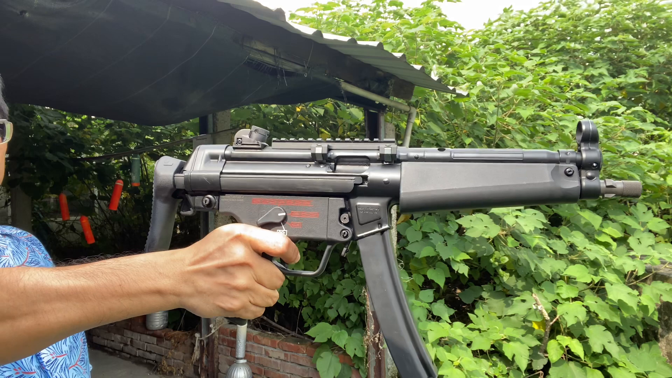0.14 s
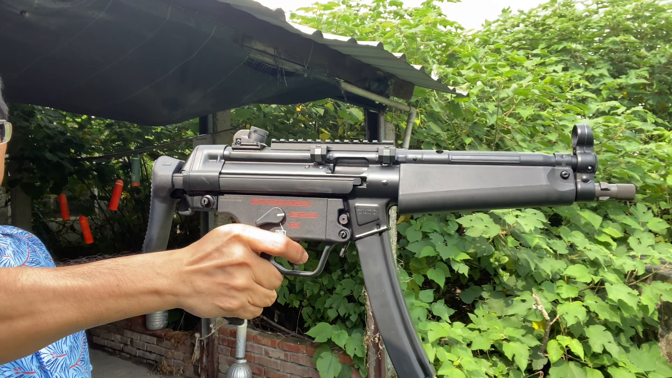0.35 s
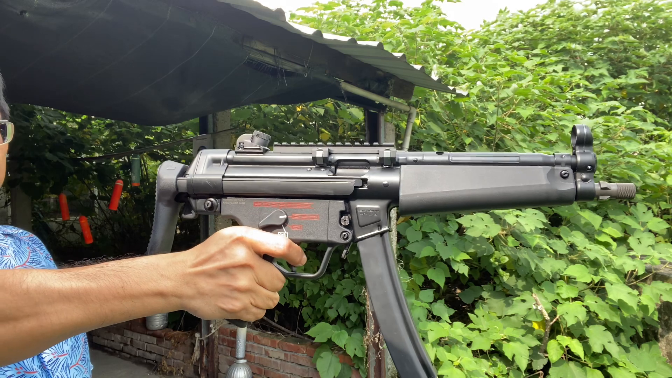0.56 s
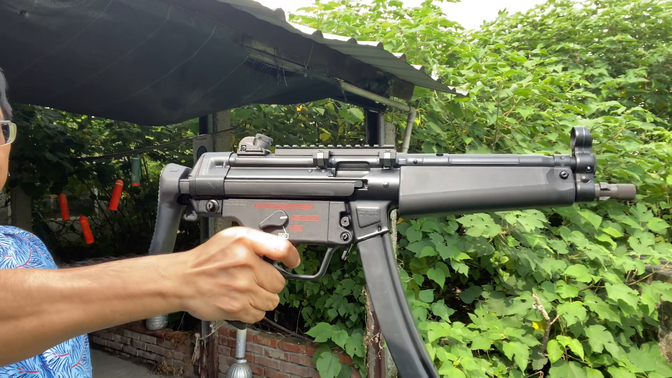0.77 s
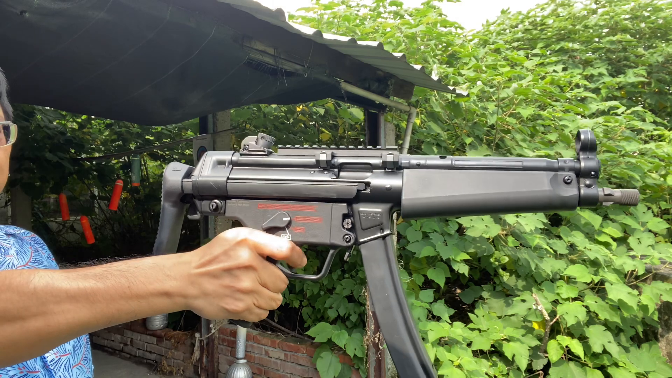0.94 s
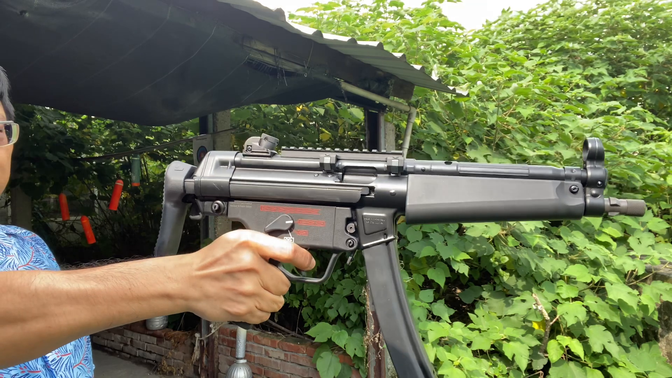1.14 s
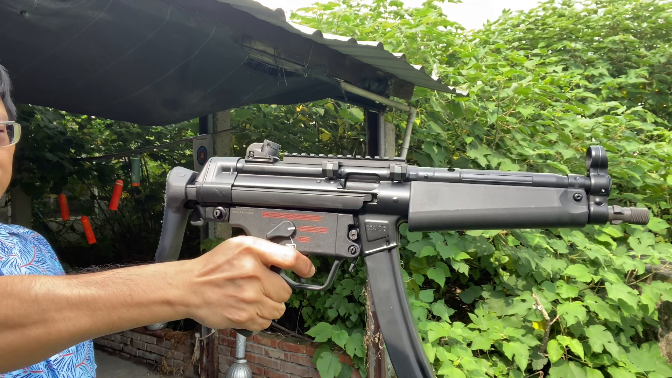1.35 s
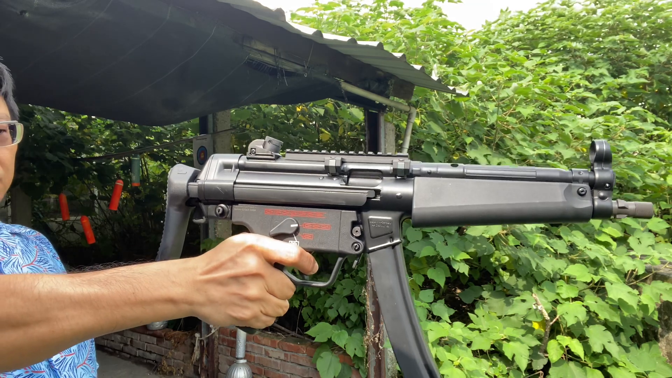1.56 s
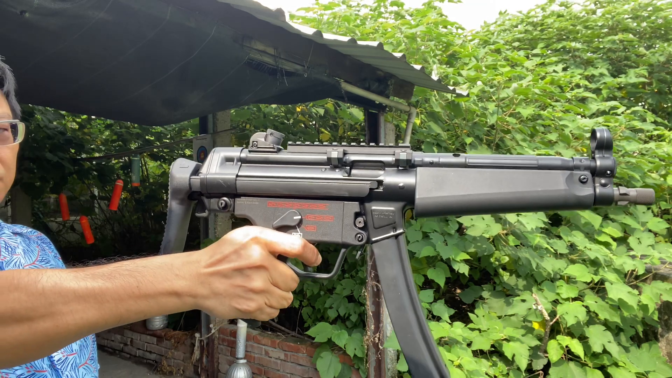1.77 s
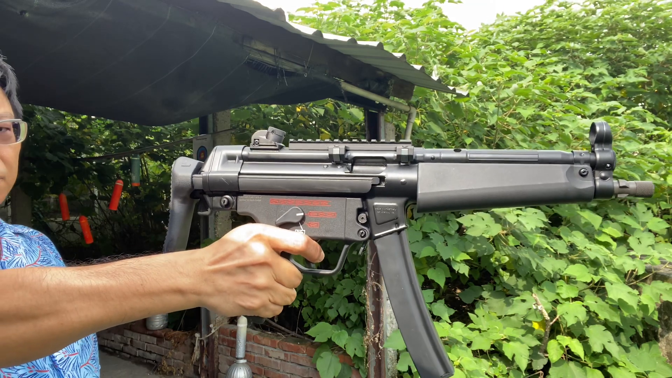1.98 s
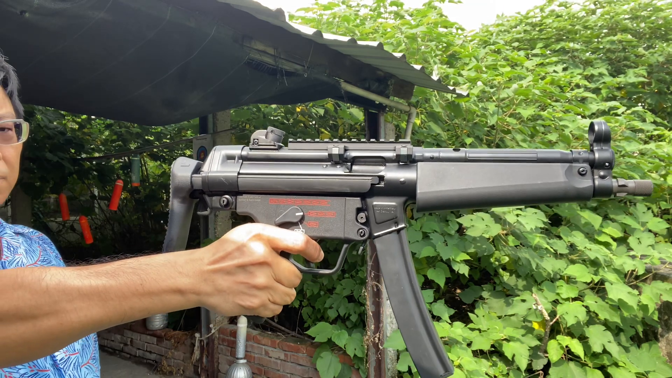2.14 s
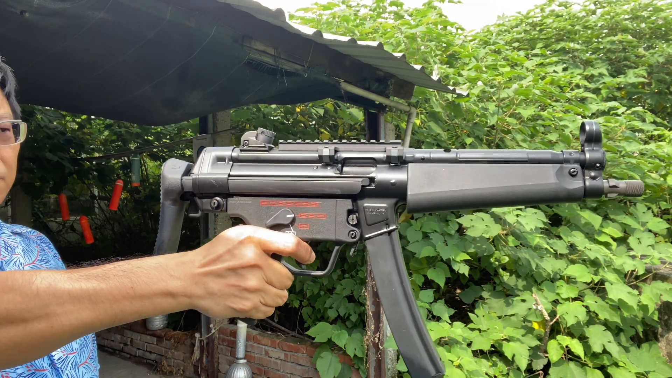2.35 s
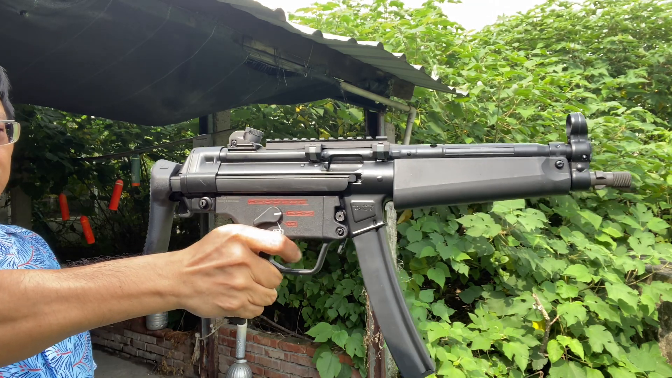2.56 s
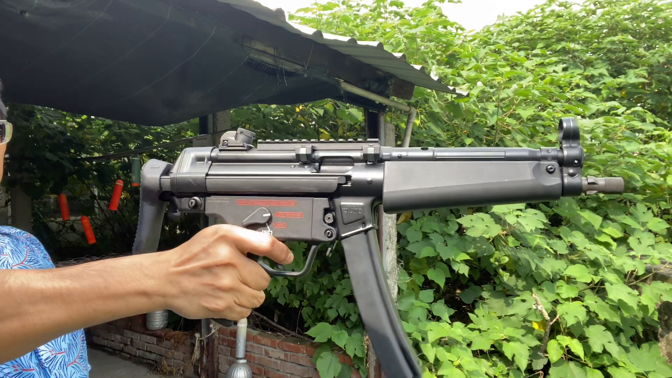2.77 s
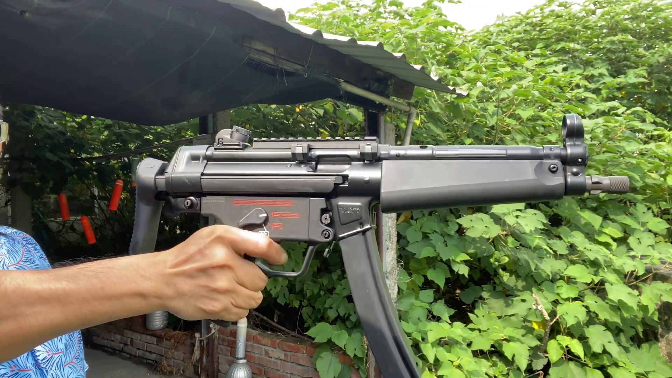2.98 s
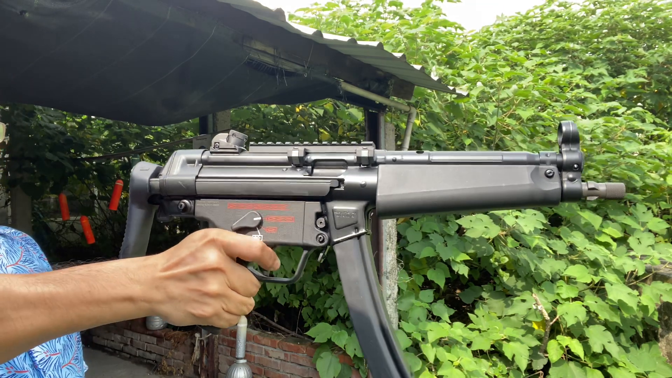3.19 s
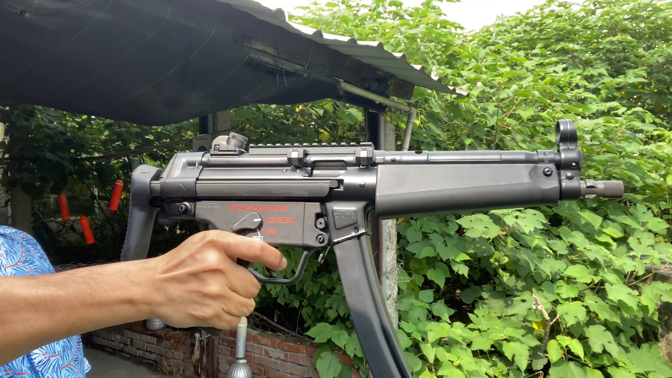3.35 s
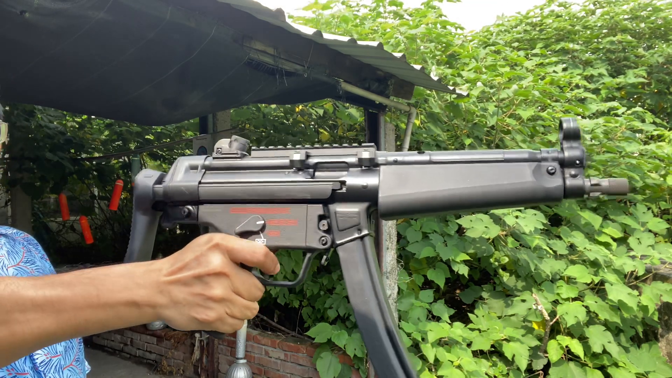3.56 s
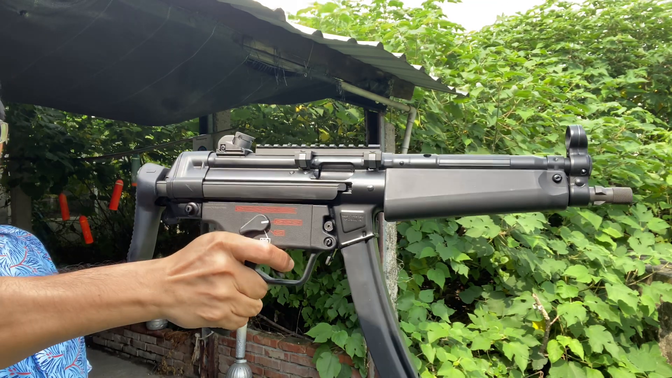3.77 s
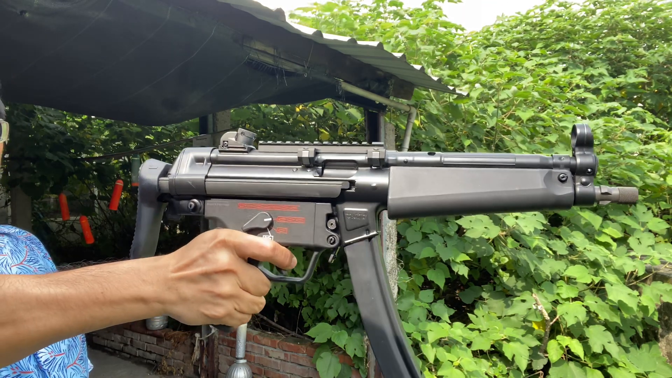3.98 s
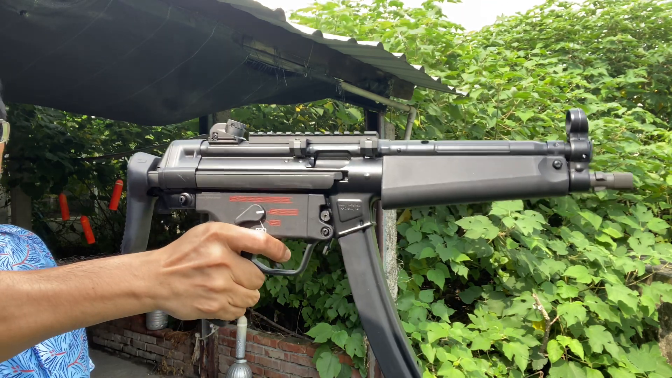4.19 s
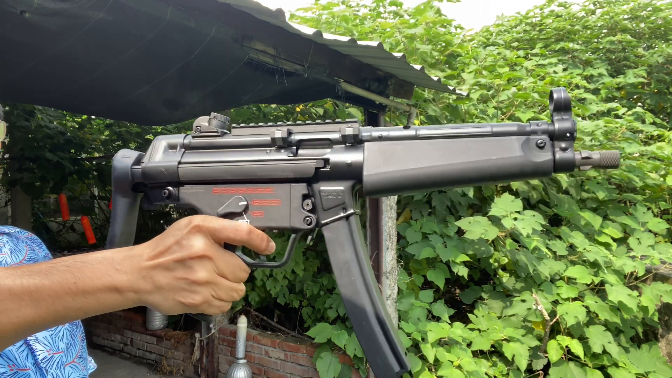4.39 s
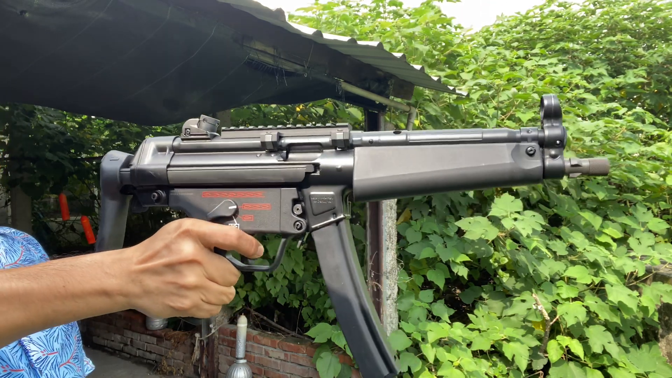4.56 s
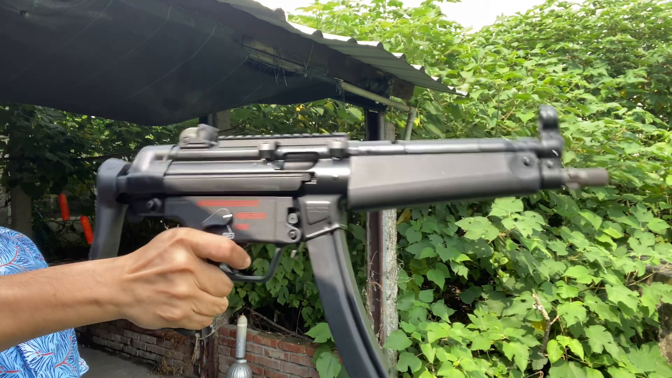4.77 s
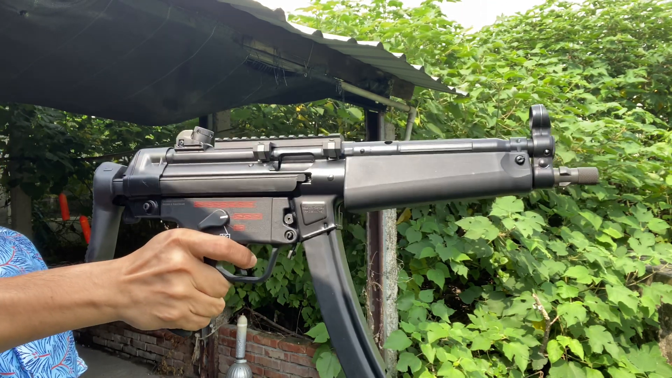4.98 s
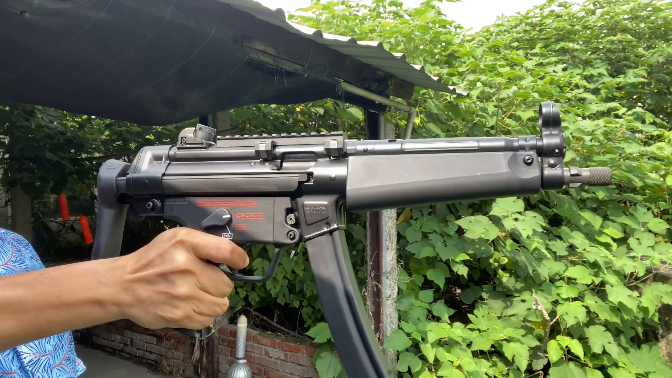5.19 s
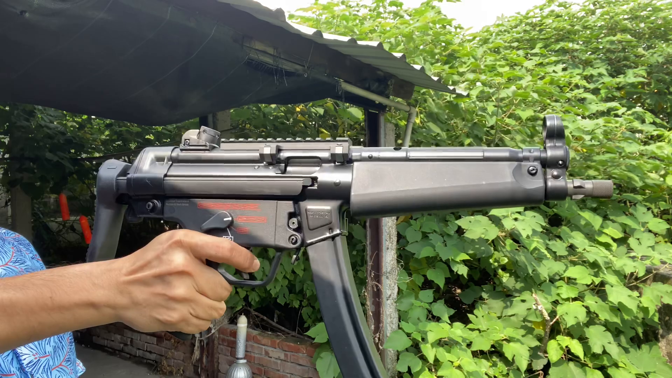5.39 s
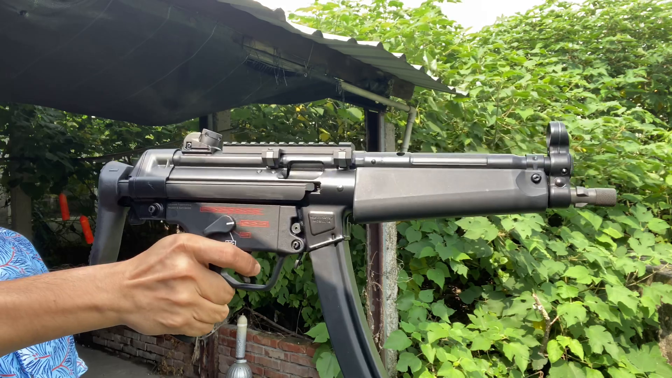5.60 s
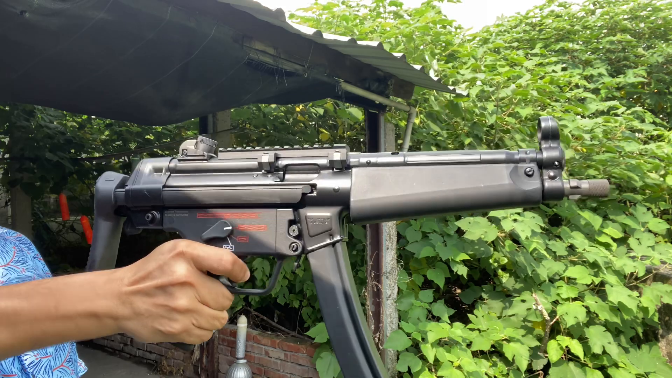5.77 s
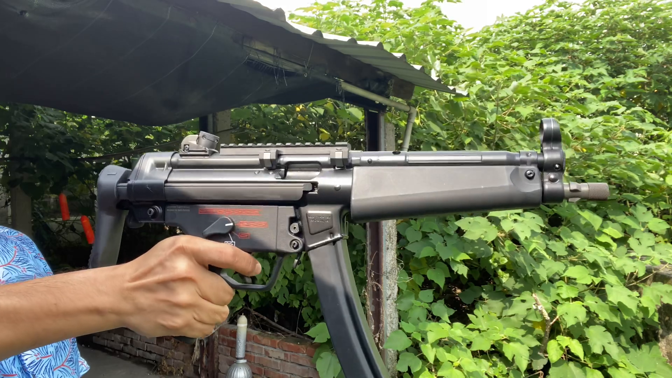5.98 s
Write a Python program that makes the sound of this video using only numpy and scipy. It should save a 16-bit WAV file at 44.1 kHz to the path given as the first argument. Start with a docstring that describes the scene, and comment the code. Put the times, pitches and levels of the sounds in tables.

```python
"""First a dying burst echo, trigger clicks and a bird call; then a close gas blowback airsoft rifle fires
seven three-round bursts under a sheet-metal roof. Each round is a timed run of noise crashes, air thumps and
a gas note: hammer on valve, bolt back to its buffer, slam home, bounce. A pellet rings a metal target; the bird
is a wavering tone. Breeze, garden air and hum are noise and a sine. The shots overload the microphone."""
import sys
import numpy as np
from scipy import signal
from scipy.fft import rfft, irfft
from scipy.io import wavfile
from scipy.ndimage import uniform_filter1d, minimum_filter1d

SR = 44100
rng = np.random.default_rng(int(sys.argv[2]) if len(sys.argv) > 2 else 0)


def dump(signal):
    """Clip the signal to [-1, 1] and save it as 16-bit WAV at the path in sys.argv[1]."""
    limited = np.clip(np.atleast_2d(signal).T, -1, 1)
    pcm = np.round(limited * 32767).astype(np.int16)
    wavfile.write(sys.argv[1], SR, pcm)


N = 266397
TIME_S = np.arange(N) / SR

# bursts, one per trigger pull; the action slows as the gas cools:
# (first hammer fall [s], time per round [s], first bolt trip back and home [s], feeding level [dB])
BURSTS = [(0.6076, 0.062, .0368, -3.5), (2.595, 0.061, 0.038, 0), (3.0049, 0.061, 0.042, -1.5),
          (3.4632, 0.065, 0.041, 3), (4.657, .062, .0428, 2), (5.147, 0.067, 0.041, 4.5),
          (5.6706, 0.069, .0452, 0)]
ROUNDS_PER_BURST = 3
BOLT_LAG_S = 0.0008  # added to the bolt trip with each round of a burst
BOUNCE_SHARE = 0.255  # bounce delay as a share of the bolt trip
FIRING_DB, SLAM_DB, BOUNCE_DB = 0, 0.46, 2.5
PRESSURE_LOSS_DB = 0.33  # per round within a burst

# trigger, sear, hammer, valve, gas, muzzle puff, buffer, receiver rattle, around the hammer fall:
# (delay [s], level [dB], t60 [s], tilt [dB/octave])
FIRING_BLOWS = [(-.013, -40, 0.048, -0.5), (-.0085, -21.5, .018, 5), (-.0035, -20.5, .05, -1),
                (.001, -2, .028, 0.3), (.005, -9, .04, 1), (.009, -6.5, .04, -1.77),
                (.014, -4.5, 0.048, 1.62), (.019, -6.5, 0.06, 0)]
# bolt strips and chambers a pellet, before the slam: (delay [s], level [dB], t60 [s], tilt [dB/octave])
FEEDING_BLOWS = [(-.007, -19.5, .04, 0), (-.0038, -12.5, .04, -1.9)]
# bolt slams home and seats: (delay [s], level [dB], t60 [s], tilt [dB/octave])
SLAM_BLOWS = [(0, 0.5, .03, -0.5), (.0028, -1, 0.019, 1.5)]
# bolt lands again, loose parts settle: (delay [s], level [dB], t60 [s], tilt [dB/octave])
BOUNCE_BLOWS = [(0, -1, 0.024, 2.5), (.006, -14.5, 0.061, -1)]
# air pumped by the firing gun: (delay [s], mean frequency [Hz], level [dB], t60 [s])
FIRING_JOLTS = [(.0002, 91.4, -7, .018), (.0036, 228.3, -11.5, 0.053), (.0096, 255, -11, .026),
                (0.0111, 583, -13, .045)]
# air pumped by the closing bolt: (delay [s], mean frequency [Hz], level [dB], t60 [s])
CLOSING_JOLTS = [(.001, 43.58, -2.5, 0.028), (.002, 24.09, -24.5, 0.32)]
# relative spectrum of the firing blows: (frequency [Hz], level [dB])
FIRING_COLOUR = [(120, -23), (300, -6), (450, -5), (580, 0), (720, 0), (1050, 3.5), (1400, -4), (1850, 0),
                 (2400, -7), (4000, -2), (7500, -8.5), (12000, -10), (16000, -14.5)]
# relative spectrum of the closing blows: (frequency [Hz], level [dB])
CLOSING_COLOUR = [(120, -19.5), (300, -14), (500, -4), (900, 1.5), (1300, 0.5), (1600, -2.5), (2400, -4),
                  (4000, 1), (7500, -6), (12000, -8.5), (13300, -10.5), (16000, -15.5)]
# receiver resonances: (frequency [Hz], width [Hz], boost [dB])
RECEIVER_MODES = [(602, 45, -3.5), (1123, 11, -9), (1230, 30, -6), (1886, 28, -3.5), (3690, 120, -8.5),
                  (5030, 180, 0.5), (7640, 77, -6), (9500, 88, -1), (14000, 400, -12.5)]
# bolt resonances: (frequency [Hz], width [Hz], boost [dB])
BOLT_MODES = [(870, 90, -2), (1327, 51, -2.5), (2080, 59, -5.5), (3430, 66, -4.5), (6523, 91, -0.5),
              (8870, 190, 1), (11610, 80, -7)]

# gas note: hollow upward swoop in every round; swoop time is a time constant
GAS_DELAY_S, GAS_LENGTH_S, GAS_SWOOP_S = 0.0095, 0.021, 0.0055
GAS_START_HZ, GAS_END_HZ, GAS_DB = 150, 606.8, -15.5

# trigger let go: (last click [s], run length [s], level [dB])
RELEASES = [(0.1871, .013, -17.5), (0.9911, .017, -17.5), (2.804, 0.012, -16.5), (3.242, .021, -17),
            (3.678, 0.019, -18.5), (4.8912, 0.012, -16.5), (5.352, 0.015, -12), (5.95, 0.013, -16)]
# clicks of one release, slack through ratchet to sear: (lead [run lengths], level [dB])
RELEASE_CLICKS = [(2.3, -17), (1, -5), (.45, -3), (0, 0)]
# relative spectrum of the trigger clicks: (frequency [Hz], level [dB])
RESET_COLOUR = [(200, -35.5), (390, -17), (520, 1.5), (1000, -4.5), (2000, -4), (4500, -2.5), (7000, -3.5),
                (11000, -4.5), (14000, -1), (16000, 0)]
# sear resonances: (frequency [Hz], width [Hz], boost [dB])
SEAR_MODES = [(15000, 200, -0.5), (13400, 400, 2.5)]
# faint ticks as the gun shifts in the hands: (time [s], level [dB])
HANDLING_TICKS = [(3.899, -57), (3.9674, -53), (4.1682, -59.5), (5.09, -54.5), (5.6, -59)]

# pellet strikes metal down range: (time [s], level [dB])
PELLET_HIT = (5.927, -37.5)
# metal target modes: (frequency [Hz], level [dB], t60 [s])
TARGET_MODES = [(1330, -10, 0.56), (1783, -12, 0.69), (2740, -9, 0.6), (2848, -5, .22), (3461, -1, 0.24),
                (3880, -6, 0.6), (4830, 2, 0.17), (5076, -7, 0.45), (6600, -7, .2)]

# relative spectrum of the shelter echo: (frequency [Hz], level [dB])
SHELTER_COLOUR = [(60, -13), (250, -4.5), (500, -1), (900, -1.5), (2400, 1), (3800, -4), (6000, -1.5),
                  (10000, -2.5), (16000, -6)]
# decay of the shelter echo: (frequency [Hz], t60 [s])
SHELTER_T60 = [(100, 0.68), (500, 0.22), (1000, 0.4), (2500, 0.3), (4000, .35), (9000, 0.29), (16000, 0.19)]
# dull repeat of the gun's echo from across the garden
FAR_ECHO_S, FAR_ECHO_DB, FAR_ECHO_CUT_HZ = 0.27, -32.5, 3100

# bird calls, held note then falling run: (start [s], length [s], time per note [s], slur [0-1], level [dB])
BIRD_CALLS = [(.214, .24, .0343, 0, -59), (1.01, .2, .04, 0, -68), (1.442, .21, .045, .1, -68),
              (1.82, .17, .036, .6, -64)]
# short buzzy chirp ending a call: (start [s], length [s], start pitch [Hz], end pitch [Hz], level [dB])
BIRD_CHIRPS = [(1.972, 0.059, 4670, 3450, -68)]
# bird echoes from across the garden: (delay [s], level [dB])
BIRD_ECHOES = [(.04, -11.5), (.098, -11), (.226, -14.5)]
BIRD_TOP_HZ, BIRD_BOTTOM_HZ = 3680, 1700  # nominal ends of the descent
BIRD_FADE_DB = 8.5  # over the descent
BIRD_STRAY = 0.04  # random pitch error of run notes, as a share
FLICK_HZ, FLICK_S = 850, 0.0074  # upward flick at each note break

# breeze on the microphone: (time [s], level [dB])
BREEZE_LEVEL = [(0, -64), (2.4, -63), (2.9, -54), (3.4, -49), (3.85, -60), (3.92, -47), (4.42, -46.5),
                (4.52, -37), (4.62, -48.5), (5.0, -53), (6.04, -62.5)]
# relative spectrum of the breeze: (frequency [Hz], level [dB])
BREEZE_COLOUR = [(15, -3), (30, 3.5), (50, 0.5), (85, -17.5), (150, -33), (400, -53), (2000, -93.5)]
# relative spectrum of the garden air: (frequency [Hz], level [dB])
GARDEN_COLOUR = [(35, -29.5), (60, -5), (168, -11.5), (469, -12), (621, -17), (803, -19), (903, -20),
                 (1660, -28.5), (3760, -30), (6740, -38.5), (14600, -40), (16000, -43.5)]
GARDEN_DB = -67

RECORDER_CUTOFF_HZ = 15900


def rifle():
    """Every round fires, feeds a pellet, slams shut and bounces; receiver and bolt ring on their blows."""
    fire_s, trip_s, fire_db, feed_db = rounds()
    slam_s = fire_s + trip_s
    bounce_s = slam_s + BOUNCE_SHARE * trip_s
    slam_db = np.full_like(fire_s, SLAM_DB)
    bounce_db = np.full_like(fire_s, BOUNCE_DB)
    firing = stroke(fire_s, fire_db, FIRING_BLOWS, FIRING_COLOUR, scatter_s=0.0004, scatter_db=2.65)
    feeding = stroke(slam_s, feed_db, FEEDING_BLOWS, CLOSING_COLOUR, scatter_s=0.00069, scatter_db=2.0)
    slam = stroke(slam_s, slam_db, SLAM_BLOWS, CLOSING_COLOUR, scatter_s=0.0001, scatter_db=1.0)
    bounce = stroke(bounce_s, bounce_db, BOUNCE_BLOWS, CLOSING_COLOUR, scatter_s=0.0002, scatter_db=1.77)
    recoil = thumps(fire_s, fire_db, FIRING_JOLTS) + thumps(slam_s, slam_db, CLOSING_JOLTS)
    closing = feeding + slam + bounce
    return resonate(firing, RECEIVER_MODES) + resonate(closing, BOLT_MODES) + recoil


def rounds():
    """Per round: hammer fall [s], bolt trip [s], firing level [dB], feeding level [dB]."""
    rows = []
    for start_s, cycle_s, trip_s, feed_db in BURSTS:
        for k in range(ROUNDS_PER_BURST):
            fire_db = FIRING_DB - k * PRESSURE_LOSS_DB
            rows.append((start_s + k * cycle_s, trip_s + k * BOLT_LAG_S, fire_db, feed_db))
    return np.transpose(rows)


def stroke(times_s, levels_db, contacts, colour, scatter_s, scatter_db):
    """One step of the cycle: a fixed run of contacts, each a little early or late."""
    track = np.zeros(N)
    for delay_s, db, t60_s, tilt_db in contacts:
        crashes = blows(times_s + delay_s, levels_db + db, t60_s, scatter_s, scatter_db)
        track += coloured(crashes, colour, tilt_db)
    return track


def blows(times_s, levels_db, t60_s, scatter_s, scatter_db, alike=0.41, grain_db=1.0, rise_s=0.00046):
    """Metal parts meet: a dense, grainy crash, partly the same each time because the same parts ring."""
    t = np.arange(int(0.09 * SR)) / SR
    envelope = fade(t, t60_s) * (1 - np.exp(-t / rise_s))
    common = rng.standard_normal(len(t))
    track = np.zeros(N)
    for s, db in zip(times_s, levels_db):
        late, harder = rng.standard_normal(2)
        crash = np.sqrt(alike) * common + np.sqrt(1 - alike) * rng.standard_normal(len(t))
        grain = rms_one(uniform_filter1d(rng.standard_normal(len(t)), size=40))
        chatter = rms_one(from_db(grain_db * grain))
        gain = from_db(db + scatter_db * harder)
        add(track, s + scatter_s * late, gain * envelope * chatter * crash)
    return track


def thumps(times_s, levels_db, jolts, spread=0.29):
    """The gun lurches with the bolt: short, heavily damped swings of pressure, random in pitch."""
    t = np.arange(SR // 4) / SR
    track = np.zeros(N)
    for s, round_db in zip(times_s, levels_db):
        for delay_s, mean_hz, db, t60_s in jolts:
            hz = mean_hz * (1 + spread * rng.standard_normal())
            swing = -np.sin(2 * np.pi * hz * t)
            add(track, s + delay_s, from_db(db + round_db) * swing * fade(t, t60_s))
    return track


def resonate(x, modes):
    """Each mode is a two-pole resonator ringing on top of the blow that drives it."""
    out = x.copy()
    driven = x + 1e-18
    for hz, width_hz, db in modes:
        r = np.exp(-np.pi * abs(width_hz) / SR)
        poles = [1, -2 * r * np.cos(2 * np.pi * hz / SR), r * r]
        out += from_db(db) * (1 - r * r) / 2 * signal.lfilter([1, 0, -1], poles, driven)
    return out


def gas_note(scatter=0.032):
    """Escaping gas: a hollow note with a strong octave swoops up and holds, its pitch varying per round."""
    fire_s, _, fire_db, _ = rounds()
    t = np.arange(int(GAS_LENGTH_S * SR)) / SR
    track = np.zeros(N)
    glide_hz = GAS_END_HZ + (GAS_START_HZ - GAS_END_HZ) * np.exp(-t / GAS_SWOOP_S)
    for s, db in zip(fire_s, fire_db):
        hz = glide_hz * (1 + scatter * rng.standard_normal())
        note = whistle(hz, GAS_DB + db, overtone_db=-1.5, waver=0.025, edge_s=0.005)
        add(track, s + GAS_DELAY_S, note)
    return track


def trigger():
    """Burst ratchet and sear spring back in a few small, bright clicks."""
    rows = [(end_s - lead * run_s, level_db + click_db)
            for end_s, run_s, level_db in RELEASES
            for lead, click_db in RELEASE_CLICKS]
    times_s, levels_db = np.transpose(rows)
    clicks = blows(times_s, levels_db, t60_s=0.012, scatter_s=0, scatter_db=0)
    return resonate(coloured(clicks, RESET_COLOUR), SEAR_MODES)


def handling(t60_s=0.05):
    """Loose fittings tick softly: faint noise crashes."""
    times_s, levels_db = np.transpose(HANDLING_TICKS)
    return coloured(blows(times_s, levels_db, t60_s, scatter_s=0, scatter_db=0.5), CLOSING_COLOUR)


def target(crack_db=9, crack_t60_s=0.092):
    """The pellet cracks against the metal, whose modes ring faintly as decaying sines."""
    hit_s, level_db = PELLET_HIT
    t = np.maximum(TIME_S - hit_s, 0)
    crack = blows([hit_s], [level_db + crack_db], crack_t60_s, scatter_s=0, scatter_db=8)
    out = coloured(crack, CLOSING_COLOUR)
    for hz, db, t60_s in TARGET_MODES:
        out += from_db(level_db + db) * np.sin(2 * np.pi * hz * t) * fade(t, t60_s)
    return out


def in_shelter(x, turn_s=0.0076, count=3):
    """Sound passes in short, overlapping, regular turns among several random diffuse echoes: a smooth tail."""
    echo = np.zeros(N)
    for k in range(count):
        away = np.abs((TIME_S / turn_s - k) % count - count / 2)
        share = np.cos(np.pi / 2 * np.minimum(away, 1))
        echo += signal.oaconvolve(x * share, shelter_response())[:N]
    return echo


def shelter_response(build_s=0.0066):
    """Diffuse echo of roof, walls and foliage: noise bands with their own decays; unit energy."""
    t = np.arange(SR) / SR
    noise = rfft(rng.standard_normal(SR))
    hz = np.fft.rfftfreq(SR, 1 / SR)
    edges_hz = np.geomspace(40, 18000, 14)
    tail = np.zeros(SR)
    for low, high in zip(edges_hz, edges_hz[1:]):
        band = irfft(noise * (hz >= low) * (hz < high), SR)
        tail += band * fade(t, at_hz(SHELTER_T60, np.sqrt(low * high)))
    tail = coloured(tail * (1 - np.exp(-t / build_s)), SHELTER_COLOUR)
    return tail / np.sqrt(np.sum(tail ** 2))


def bird():
    """Calls hold a top note, then step or slur down and fade with upward flicks; the garden echoes them."""
    track = np.zeros(N)
    for s, length_s, note_s, slur, db in BIRD_CALLS:
        t = np.arange(int(length_s * SR)) / SR
        note, since_s = np.divmod(t, note_s)
        in_run = note > 0
        fallen_s = note * note_s + slur * (since_s - note_s / 2)
        descent = in_run * fallen_s / (length_s - note_s)
        stray = 1 + BIRD_STRAY * in_run * rng.standard_normal(size=32)[note.astype(int)]
        flick_hz = FLICK_HZ * in_run * np.exp(-(since_s / FLICK_S) ** 2)
        hz = (BIRD_TOP_HZ + (BIRD_BOTTOM_HZ - BIRD_TOP_HZ) * descent) * stray + flick_hz
        add(track, s, whistle(hz, db - BIRD_FADE_DB * descent))
    for s, length_s, start_hz, end_hz, db in BIRD_CHIRPS:
        hz = np.linspace(start_hz, end_hz, int(length_s * SR))
        add(track, s, whistle(hz, db, waver=0.07))
    heard = track.copy()
    for delay_s, db in BIRD_ECHOES:
        add(heard, delay_s, from_db(db) * track)
    return heard


def whistle(hz, level_db, overtone_db=-18, waver=0.0075, edge_s=0.008):
    """A thin, wavering tone along a pitch path, with an octave overtone and soft ends."""
    t = np.arange(len(hz)) / SR
    drift = rms_one(uniform_filter1d(rng.standard_normal(SR), size=200))[:len(hz)]
    phase = 2 * np.pi * np.cumsum(hz * (1 + waver * drift)) / SR
    envelope = from_db(level_db) * np.minimum(1, np.minimum(t, t[-1] - t) / edge_s)
    return envelope * (np.sin(phase) + from_db(overtone_db) * np.sin(2 * phase))


def outdoors(hum_hz=120, hum_db=-73, air_tilt_db=0.12):
    """Quiet garden air, breeze rumbling on the microphone (both shaped noise) and a far mains hum."""
    air = rms_one(coloured(rng.standard_normal(N), GARDEN_COLOUR, air_tilt_db))
    breeze = rms_one(coloured(rng.standard_normal(N), BREEZE_COLOUR))
    breeze_db = np.interp(TIME_S, *np.transpose(BREEZE_LEVEL))
    hum = np.sin(2 * np.pi * hum_hz * TIME_S)
    return from_db(GARDEN_DB) * air + from_db(breeze_db) * breeze + from_db(hum_db) * hum


def coloured(x, colour, tilt_db=0, size=8192):
    """Causal (minimum-phase) filter with the given spectrum; white noise keeps its power."""
    hz = np.maximum(np.fft.rfftfreq(size, 1 / SR), 1)
    gain = rms_one(from_db(at_hz(colour, hz) + tilt_db * np.log2(hz)))
    # folding the cepstrum onto positive time gives minimum phase
    cepstrum = irfft(np.log(gain + 1e-9))
    cepstrum[1:size // 2] *= 2
    cepstrum[size // 2 + 1:] = 0
    impulse = irfft(np.exp(rfft(cepstrum)))[:size // 2]
    return signal.oaconvolve(x, impulse)[:len(x)]


def from_db(db):
    """Decibels to gain."""
    return 10 ** (np.asarray(db) / 20)


def rms_one(x):
    """Scale to unit rms."""
    return x / np.sqrt(np.mean(x ** 2) + 1e-20)


def at_hz(points, hz):
    """Read a table on a log-frequency axis."""
    f, value = np.transpose(points)
    return np.interp(np.log(hz), np.log(f), value)


def fade(t, t60_s):
    """Exponential decay, 60 dB down at t60."""
    return np.exp(-np.log(1000) * t / max(t60_s, 1e-3))


def add(track, s, sound):
    """Mix a sound into a track at a time in seconds."""
    i = max(int(round(s * SR)), 0)
    track[i:i + len(sound)] += sound[:max(N - i, 0)]


def scene(echo_db=-22.5, bird_echo_db=-8, earlier_db=-12.5):
    """Gun close and dry, bird far and wet; an earlier burst's echo is still dying at the start."""
    gun = rifle() + gas_note() + trigger() + handling()
    song = bird()
    shelter = shelter_response()
    echo = from_db(echo_db) * in_shelter(gun)
    far_lowpass = signal.butter(2, FAR_ECHO_CUT_HZ, fs=SR, output="sos")
    dull = signal.sosfilt(far_lowpass, echo)
    add(echo, FAR_ECHO_S, from_db(FAR_ECHO_DB) * dull)
    earlier = coloured(shelter, FIRING_COLOUR, tilt_db=-1.65)[SR // 50:]
    add(echo, 0, from_db(earlier_db) * earlier)
    song_echo = from_db(bird_echo_db) * signal.oaconvolve(song, shelter)[:N]
    return (gun + echo + song + song_echo + target() + outdoors())[None]


def record(dry, limit=1.9, top=0.9):
    """A fast limiter holds the shots down, tanh rounds the peaks, filters cut both ends of the range."""
    gain = np.minimum(1, limit / (np.abs(dry) + 1e-9))
    gain = uniform_filter1d(minimum_filter1d(gain, size=45), size=45)
    held = top * np.tanh(dry * gain / top)
    highpass = signal.butter(1, 8, "high", fs=SR, output="sos")
    lowpass = signal.ellip(12, 0.1, 70, RECORDER_CUTOFF_HZ, fs=SR, output="sos")
    return signal.sosfilt(lowpass, signal.sosfilt(highpass, held))


dry = scene()
out = record(dry)
dump(out)
```